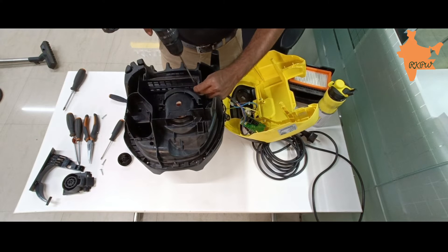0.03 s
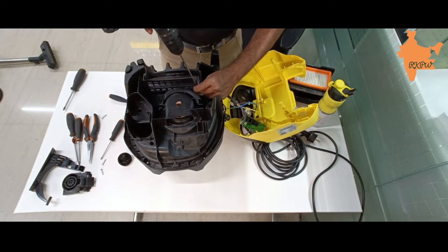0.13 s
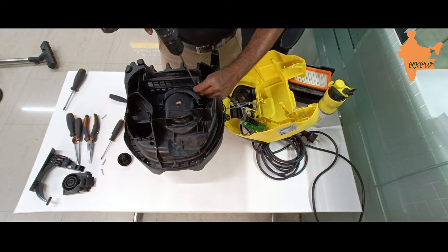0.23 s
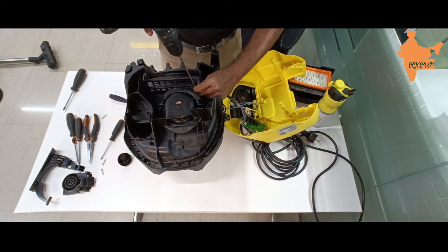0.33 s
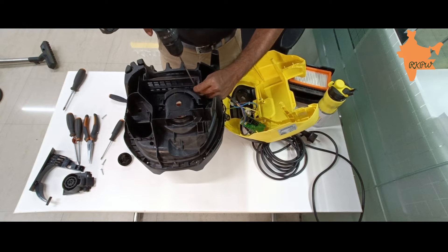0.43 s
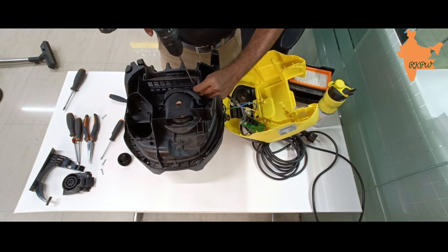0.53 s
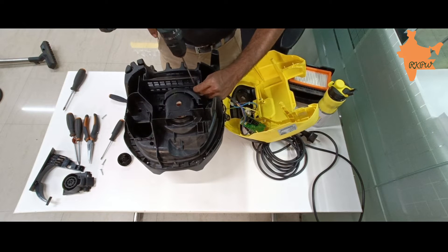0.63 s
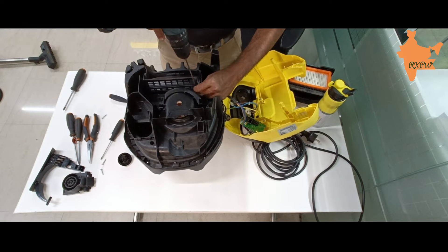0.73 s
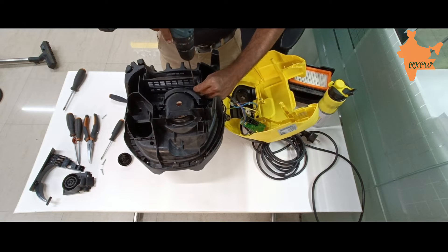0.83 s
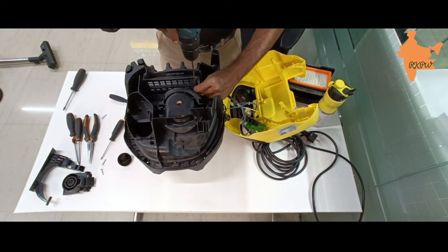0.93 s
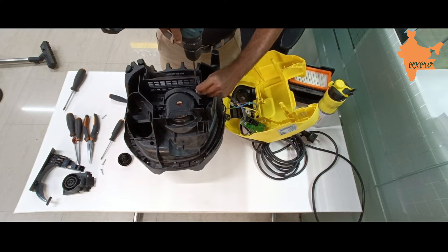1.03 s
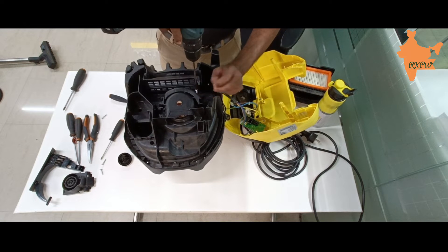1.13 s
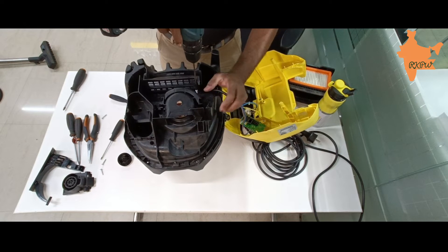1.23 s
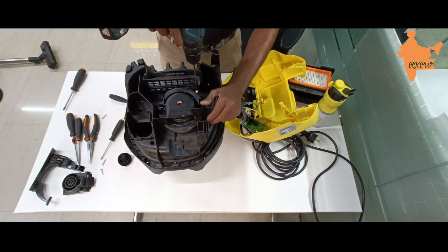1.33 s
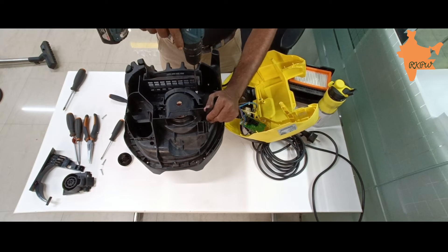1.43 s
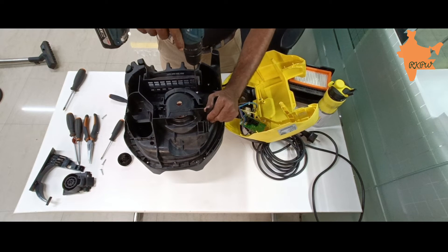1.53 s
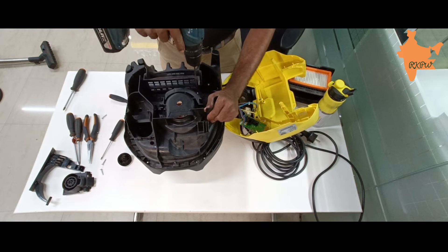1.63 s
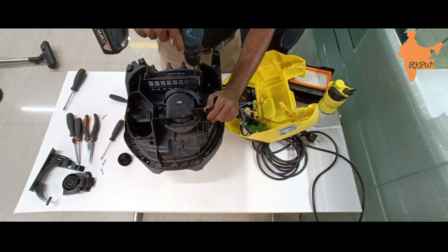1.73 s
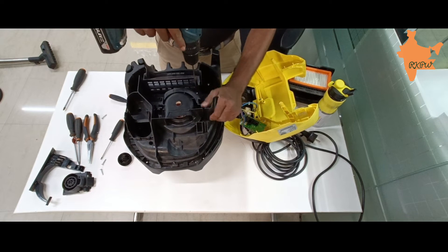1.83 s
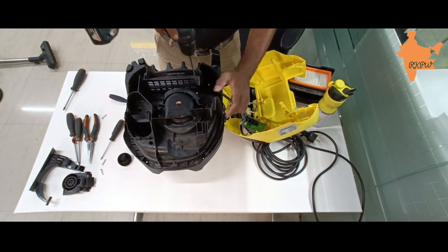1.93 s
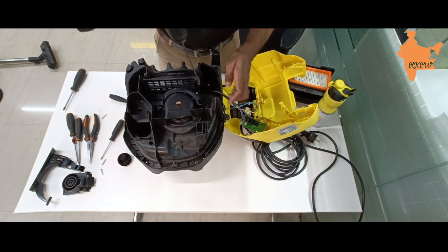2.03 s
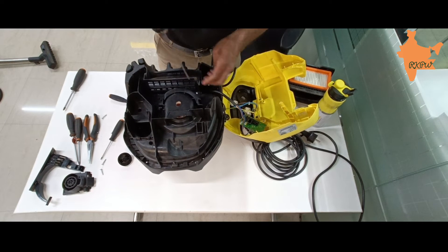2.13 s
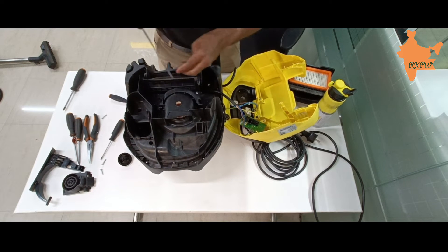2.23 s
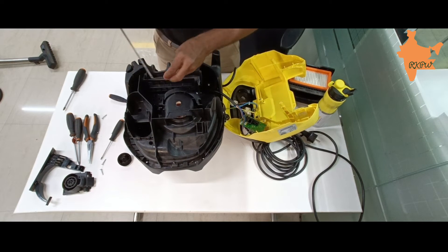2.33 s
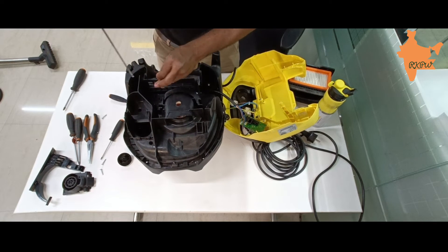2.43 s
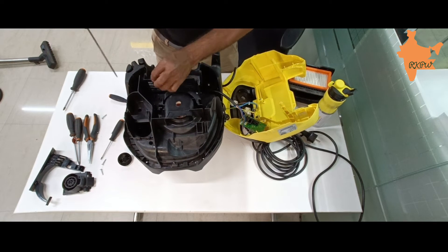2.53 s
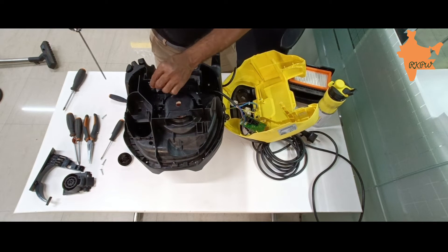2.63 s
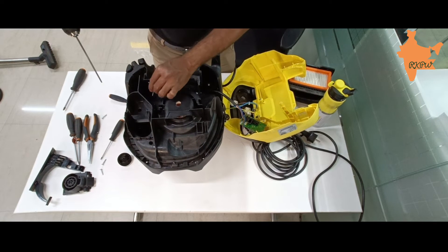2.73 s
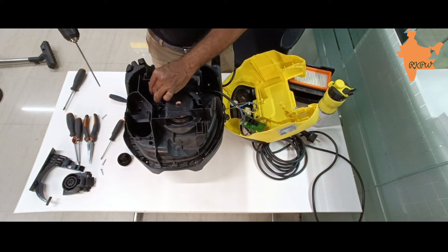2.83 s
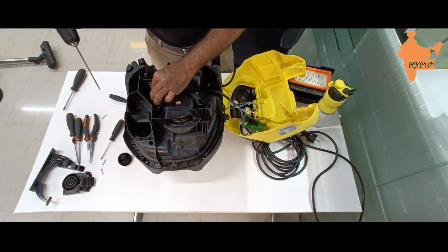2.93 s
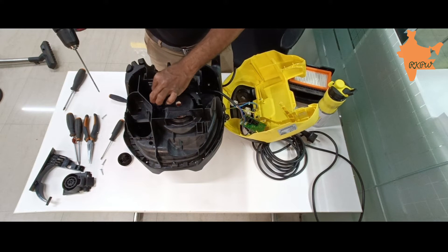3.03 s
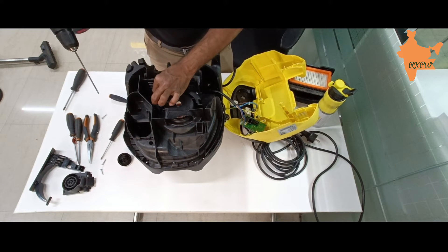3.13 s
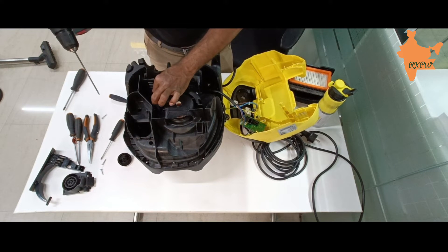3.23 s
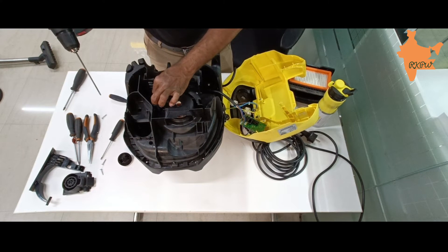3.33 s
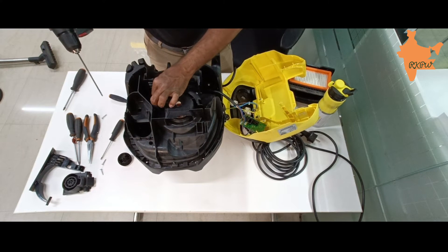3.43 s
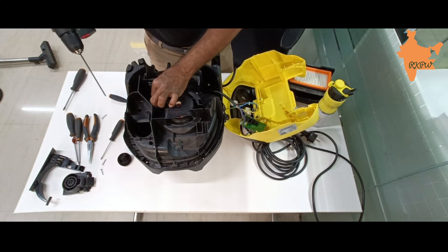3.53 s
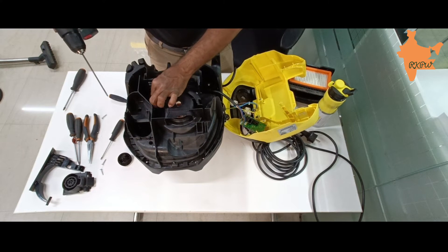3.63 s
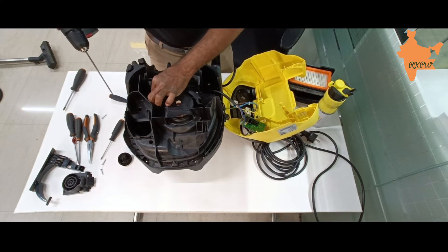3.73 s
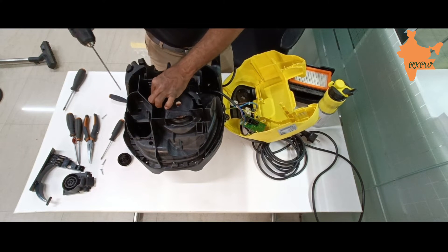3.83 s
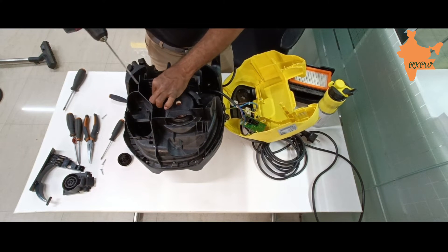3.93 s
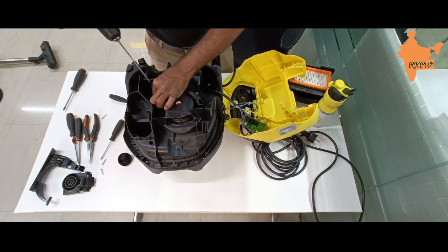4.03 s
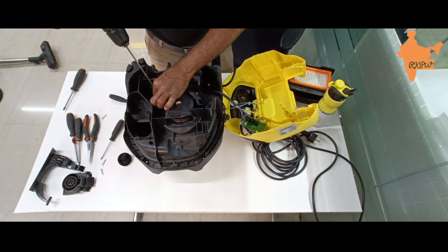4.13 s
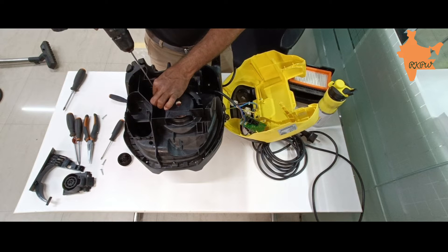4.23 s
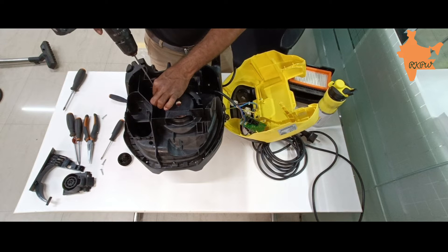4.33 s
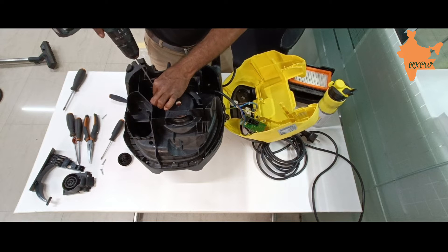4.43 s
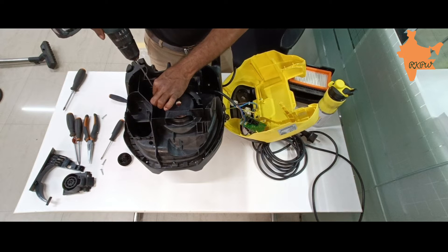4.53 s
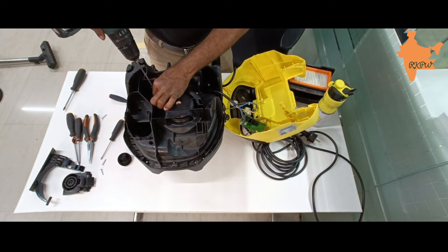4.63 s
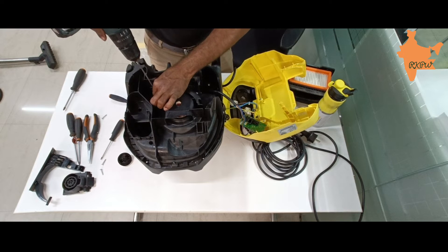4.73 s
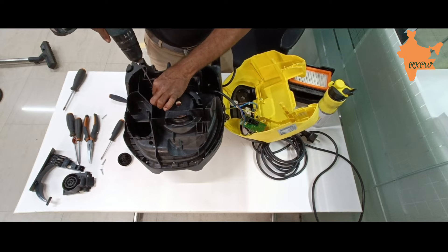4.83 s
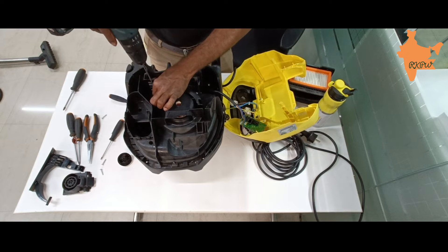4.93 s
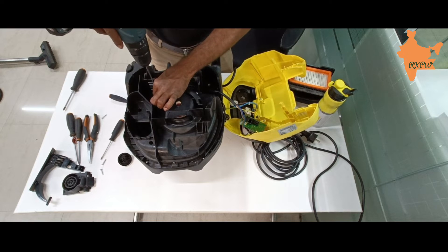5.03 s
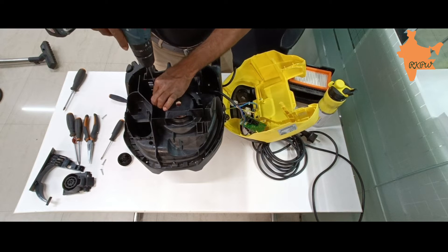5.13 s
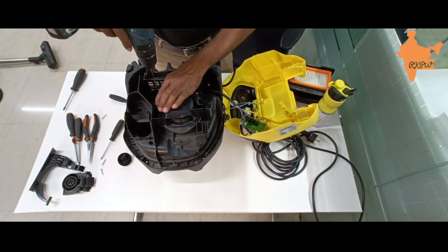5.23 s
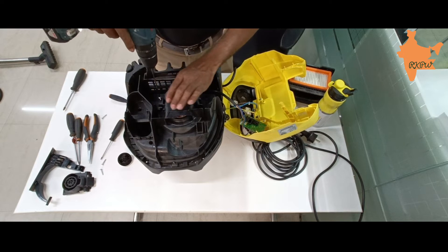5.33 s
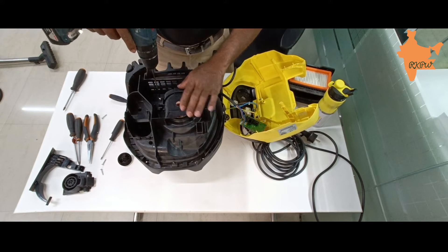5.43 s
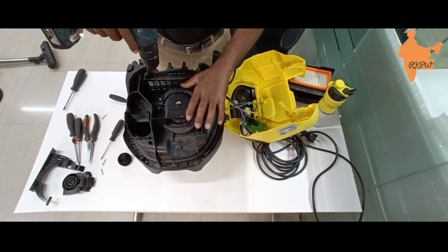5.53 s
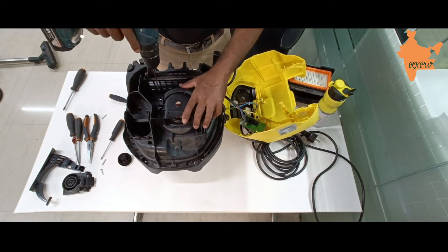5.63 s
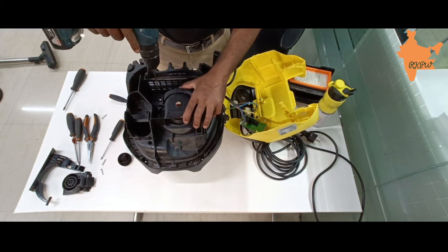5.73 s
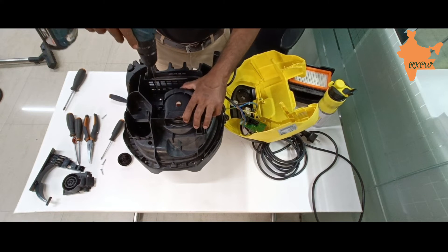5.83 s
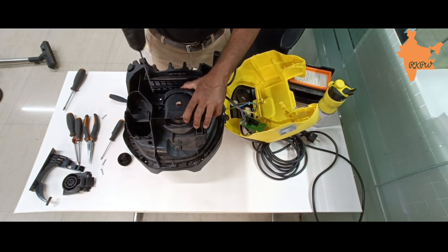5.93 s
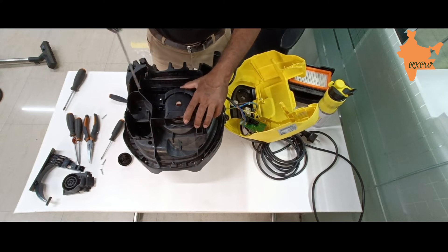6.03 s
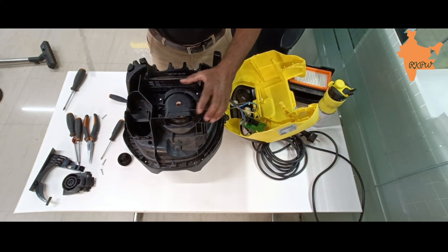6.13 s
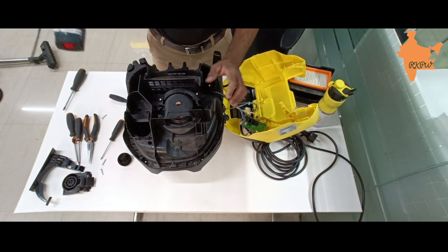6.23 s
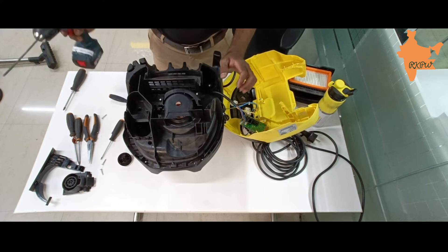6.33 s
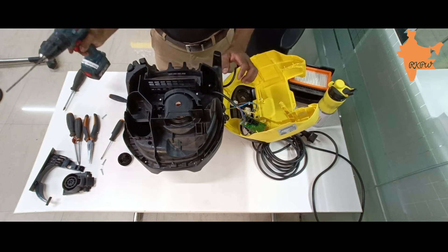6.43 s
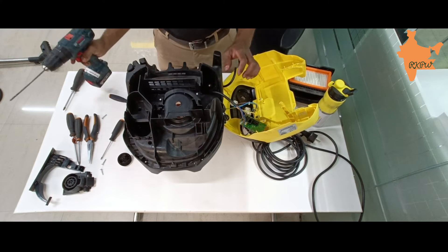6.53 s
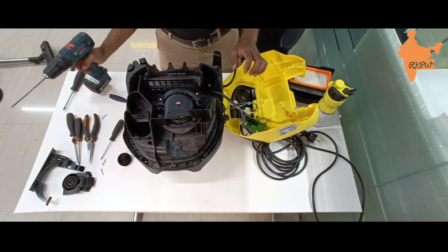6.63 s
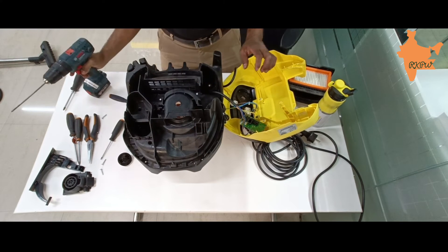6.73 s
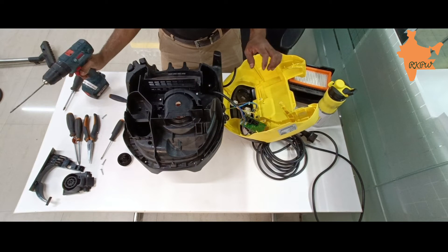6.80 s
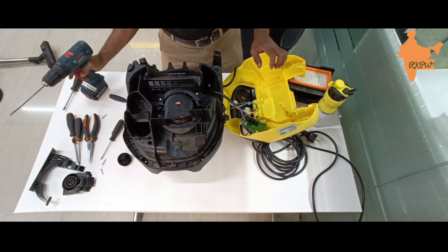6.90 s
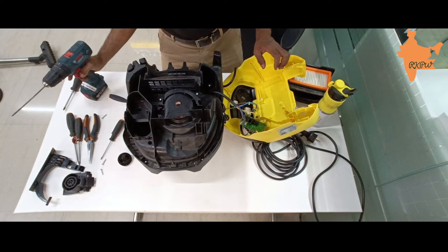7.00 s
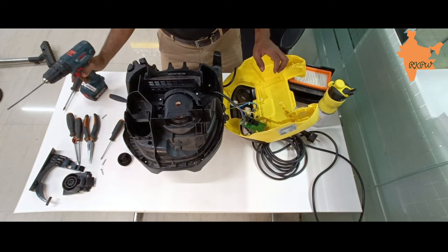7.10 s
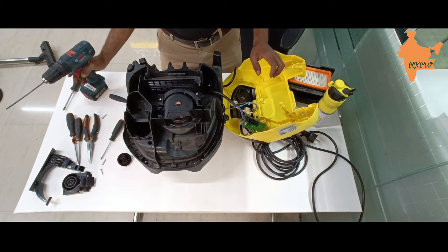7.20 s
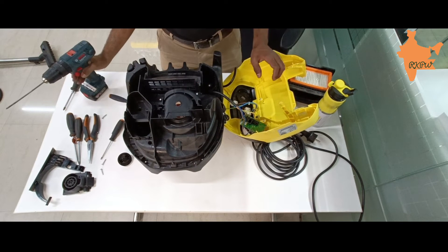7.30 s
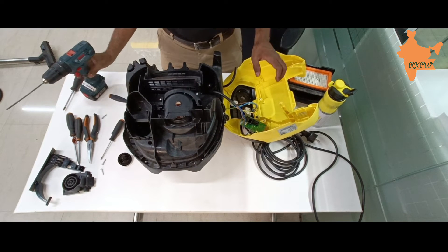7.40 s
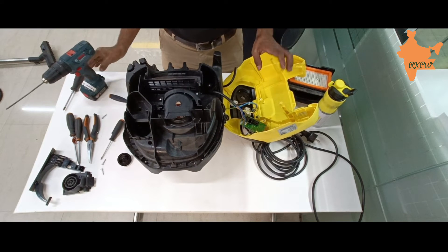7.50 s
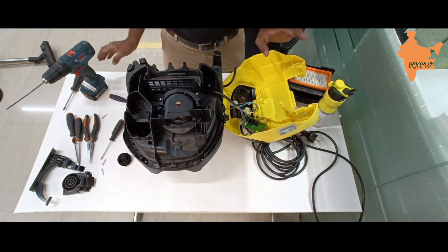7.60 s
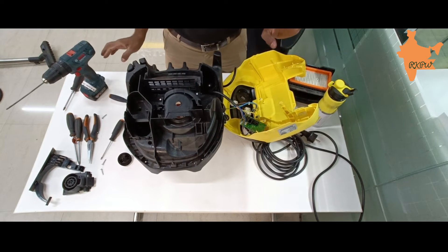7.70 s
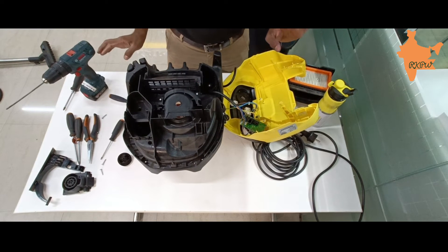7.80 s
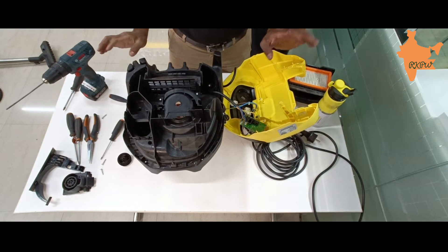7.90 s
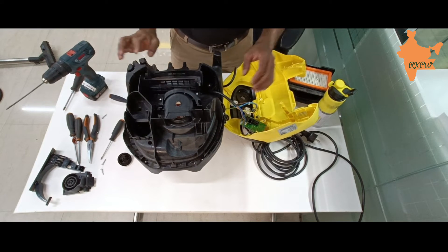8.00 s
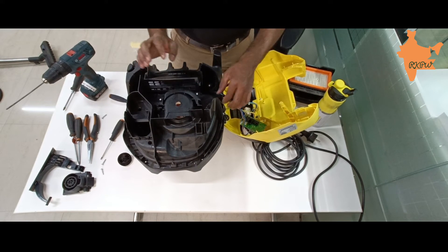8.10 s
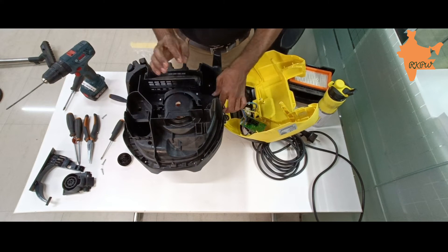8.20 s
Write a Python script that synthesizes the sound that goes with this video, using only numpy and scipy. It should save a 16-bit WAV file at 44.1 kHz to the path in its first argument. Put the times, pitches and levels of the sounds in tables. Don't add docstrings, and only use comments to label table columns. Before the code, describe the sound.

Quiet room air and distant engine hum, with tiny ticks. A power drill speeds up sharply, then brakes with a rattling clatter. A dropped screw tinkles in quick bounces, dying into a roll. After small clicks, the drill runs again at a steadier, lower pitch, thudding and clattering to a stop. The tool lands on the table in several wooden knocks, then plastic taps and a scrape. Everything rings in a reflective workshop, picked up in stereo.

```python
import sys
import numpy as np
from scipy import signal
from scipy.fft import rfft, irfft
from scipy.io import wavfile
from scipy.ndimage import uniform_filter1d

SR = 44100
rng = np.random.default_rng(int(sys.argv[2]) if len(sys.argv) > 2 else 0)


def store_wav(level_fs):
    pcm = np.round(np.clip(np.atleast_2d(level_fs), -1, 1) * 32767)
    wavfile.write(sys.argv[1], SR, pcm.T.astype(np.int16))


def level_to_linear(level):
    exponent = np.asarray(level, float) / 20
    return 10 ** exponent


N = 364266
T = np.arange(N) / SR
SIDES = np.array([[1], [-1]])

# [t/s, gear speed f/Hz, whine level/dB, second mesh level/dB]
RUN_1 = [
    (0.81, 522.6, -50.5, -51),
    (0.889, 713, -39.5, -46.5),
    (0.95, 778.4, -35.5, -46),
    (1.225, 796, -37, -47),
    (1.262, 954, -36, -47.5),
    (1.321, 1510, -34.5, -35.5),
    (1.36, 1710, -24, -32),
    (1.42, 1856, -22.5, -27),
    (1.451, 1904, -32, -42.5),
]
# [t/s, gear speed f/Hz, whine level/dB, second mesh level/dB]
RUN_2 = [
    (4.88, 764.5, -38, -58.5),
    (4.94, 1053, -34.5, -58.5),
    (4.99, 1206, -32.5, -43),
    (5.041, 1231, -34.5, -33.5),
    (5.129, 1221, -30, -35),
    (5.211, 1172, -29, -35.5),
    (5.268, 1221, -29.5, -34),
    (5.34, 1237, -29.5, -33),
    (5.429, 1368, -33, -30),
]
# [multiple of gear speed, level below second mesh/dB]
SIDE_LINES = [
    [(.49, -16.5), (.79, -10), (.985, -7)],
    [(.49, -9), (.79, -34), (.94, -11)],
]
# [multiple of gear speed, level re whine/dB]
VENT_LINES = [(5.45, -1.5), (5.999, -12), (8, -8.5)]
VENT_HZ, VENT_OCTAVES = 7100, 0.34
MESH_ORDER = 2.055
GEAR_JITTER = .0095
SURGE_JITTER, SURGE_FLICKER_DB = .002, .7
STEADY_DB, SWAY_DB = 1.8, .7
# [f/Hz, level/dB]
HISS_SPECTRUM = [(150, -51), (250, -9), (507, -19), (563, -7), (717, -15.5), (1140, -8), (1790, -12.5),
                 (2440, -6), (2900, -7.5), (5690, -6), (6760, -5), (15500, -19)]
# [f/Hz, width/Hz, level/dB]
AIR_SLOTS = [(6050, 350, -3), (6700, 400, 0), (7300, 350, -4)]
AIR_SLOTS_DB, HISS_FLICKER_DB = -9, 1.2
# [t/s, hiss level at IDLE_HZ/dB]
TRIGGER_PULLS = [
    (0.772, -32),
    (4.841, -30.5),
]
IDLE_HZ, HISS_DB_PER_OCTAVE, SPIN_UP_S, HISS_RUNS_ON_S = 806, 7.5, 0.03, 0.0095
PORT_LAG_SAMPLES = 8

# [t/s, hold/s, level/dB, body thump level/dB]
BRAKE_STOPS = [
    (1.423, 0.16, -14, -26),
    (5.414, 0.15, -13, -22),
]
# [f/Hz, level/dB]
CHATTER_SPECTRUM = [(410, -47.5), (700, -20), (766, -3.5), (955, -16.5), (1390, -3), (1560, -8.5),
                    (2000, -8), (2520, -10.5), (6670, -9.5), (9220, -17.5), (13800, -15.5), (15500, -25.5)]
# [f/Hz, width/Hz, level/dB]
GEAR_CASE = [(1382, 36, 0.5), (2225, 16, -6.5), (2930, 150, -8.5), (3568, 160, -6), (4310, 40, -9.5),
             (5600, 41, -7.5), (6050, 38, -1.5), (6470, 420, -3.5)]
# [f/Hz, width/Hz, level/dB]
HOUSING_MODES = [(331.5, 35, 1.5), (505, 35, -1.5), (579, 21, -4), (792, 31, -6.5), (1350, 53, 0),
                 (2010, 75, -6.5)]
GEAR_CASE_DB, RUMBLE_DB, BRAKE_EDGE_S = -12, -1, 0.011
BRAKE_SAG_DB, BRAKE_RELEASE_S, BRAKE_RELEASE_DB, THUMP_RELEASE_DB = -4.5, 0.053, -24, -12.5
TOOTH_HZ, TOOTH_DEPTH, TOOTH_SHARE = 69.1, 1.2, 0.099

# [t/s, peak level/dB, top level/dB, left minus right level/dB]
SCREW_BOUNCES = [(1.8698, -4, -23.5, 0.5), (1.9227, -8.5, -34, 0.5), (2.0489, -9, -44, -2),
                 (2.0963, -8, -43.5, -1), (2.1482, -10.5, -48.5, -2), (2.224, -14.5, -44, 0),
                 (2.2704, -5, -37.5, 0.5), (2.3502, -11.5, -17, 2), (2.3702, -8, -19, -6),
                 (2.436, -17.5, -21, 1), (2.4585, -9.5, -46, -8.5), (2.5318, -10, -23, -4),
                 (2.5877, -11, -20, -1), (2.6251, -18, -19, -6), (2.6605, -15.5, -25.5, -6),
                 (2.6984, -15, -29.5, -3), (2.7279, -28.5, -30.5, -12.5), (2.7708, -28, -37, -10),
                 (2.4, -41, -30, 1.5), (2.4926, -23, -32, 3.5), (2.547, -20.5, -32, 3),
                 (2.605, -16, -25, -5.5), (2.653, -16.5, -28, 5), (2.7485, -19, -22, -1),
                 (2.792, -20, -33, -10), (2.7386, -19.5, -30, -5), (2.809, -29, -30, -12),
                 (2.8338, -25, -35, -14), (2.851, -27, -32, -18), (2.877, -31, -30, -17)]
# [t/s, peak level/dB, low ring level/dB, top level/dB, left minus right level/dB]
METAL_TICKS = [(0.0942, -33, -10, -27, -7), (0.2294, -46.5, -22, -5, -4), (0.7577, -35.5, -14, -4, 4.5),
               (3.1694, -61, 11, -13.5, 7), (3.2869, -43, 18.5, -16.5, 0.5),
               (3.3134, -42.5, 10.5, -40, -14), (3.319, -43, 0, -40, 12), (3.4471, -32.5, 11, -47, 3),
               (3.4894, -48.5, 16, -47, 6), (3.5438, -29, 10.5, -35, -7), (3.552, -21, -5.5, -36, -16),
               (4.4094, -46.5, -5, -25, 0), (4.817, -22, -31.5, -11.5, 3), (7.9513, -24.5, -13, -41, -8.5),
               (8.1599, -28.5, 2.5, -12, -5)]
# [f/Hz, level/dB, t60/s]
SCREW_MODES = [(2900, -4, 0.015), (3550, -2, 0.03), (4300, -5, 0.03), (5100, -3, .025), (6200, 0, .025),
               (6900, 0, 0.03), (7700, -3, 0.025)]
TILE_RING_DB, METAL_TAIL_GAIN = -23.5, .13
ROLL_START_S, ROLL_END_S, ROLL_REST_S = 2.37, 2.816, 0.058
ROLL_DB, ROLL_SAG_DB = -32.5, -7

# [t/s, peak level/dB, ring f/Hz, mid level/dB, top level/dB]
PLASTIC_KNOCKS = [(0.1, -44.5, 402, -17, 1), (0.562, -40.5, 607, -3, -4), (1.148, -31.5, 307, 17, 14),
                  (3.543, -35, 304, 11.5, 7), (4.704, -38.5, 574, -15, -16.5), (4.837, -36.5, 570, 10, 8),
                  (5.429, -16.5, 448, 5, -16), (5.602, -26.5, 345, -18.5, -18), (7.782, -52, 342, -15, -14),
                  (8.006, -50, 354, 4, -2), (8.082, -23, 335, 5, -11.5), (8.12, -29.5, 400, -20, -32),
                  (8.2535, -26.5, 724, 3, -3.5)]
# [multiple of ring f, level/dB]
PLASTIC_OVERTONES = [(1, 13.5), (1.299, -10.5), (1.681, -16), (2.4, 0.5), (3.0, -10.5)]
KNOCK_CYCLES = 39
# [t/s, peak level/dB, deep share level/dB, mid level/dB, top level/dB]
LANDINGS = [
    (6.555, -26, -10, 5.5, -16),
    (6.576, -30, 1.5, -6.5, -24),
    (6.679, -17, -8, -3, -11.5),
    (6.717, -23, -18, -6, -12),
    (6.744, -35.5, 0, 4, -32.5),
    (6.867, -25, 2.5, -6, -21),
    (6.926, -36.5, -5, -23, -26),
]
# [f/Hz, level/dB, t60/s]
TABLE_MODES = [(123, -9, 0.37), (172, -7.5, 0.67), (298, 1.5, 0.24), (342, -7, 0.56), (403, 4, 0.35),
               (486.6, -5.5, 0.27), (629, -14, 0.4), (710, -18, 0.18)]
HELD_SHARE, TABLE_BUZZ_DB = 0.61, -8.5
# [f/Hz, level/dB, t60/s]
RIB_MODES = [(1106, 1, 0.04), (1506, -2, 0.069), (1767, 6.5, .05), (2130, -5, 0.1), (2290, -10.5, 0.029),
             (2852, -12, 0.039), (3980, -8, 0.091)]
# [t/s, peak level/dB]
SEATING = [
    (5.386, -1),
]
# [f/Hz, level/dB, t60/s]
SHELL_MODES = [(345, 3.5, 0.068), (571, 2.5, 0.078), (482, 2, 0.033), (1025, -36, 0.072),
               (1350, -35, 0.036)]
# [t/s, peak level/dB, f/Hz]
TABLE_JOLTS = [
    (1.434, -17, 64.4),
    (1.465, -15.5, 52.2),
    (5.397, -28.5, 55.7),
    (5.471, -28, 147.3),
    (5.525, -27.5, 124.7),
]
# [f/Hz, width/Hz, level/dB]
DRILL_SHELL = [(1235, 100, 8), (1950, 19, 4), (2255, 63.4, 2), (2840, 39, -8), (3550, 30, -9.5),
               (4060, 98, 0), (5120, 130, -8.5), (6060, 140, -11), (6680, 75, -29)]
LOOSE_DB, LOOSE_T60_S = -19, 0.26
# [t/s, peak level/dB, f/Hz, t60/s, push/s]
LONE_RINGS = [(0.563, -32, 305, 0.096, 0.0018), (0.583, -28, 276, 0.057, 0.0023),
              (0.604, -33, 263, .12, .004), (0.624, -37, 250, 0.095, .004), (3.546, -36, 560, .08, 0.0027),
              (3.548, -45, 3600, .4, .004), (3.56, -49, 3570, .3, .01), (3.56, -52, 2500, .3, .01),
              (3.56, -60, 6100, .3, .01), (3.548, -46, 3380, .3, .004), (3.548, -54, 5670, 0.25, .004),
              (4.718, -35, 254, 0.064, .003), (4.751, -33, 233.5, .07, .006),
              (4.838, -27, 2070, 0.027, .002), (4.838, -37.5, 1115, 0.08, .002),
              (6.558, -33, 410, .3, .004), (6.69, -36, 403, 0.93, 0.016), (8.085, -30, 471, 0.16, .002),
              (8.155, -39.5, 282, 0.36, .01), (8.165, -37, 634, 0.067, .004),
              (.101, -47, 1850, 0.037, .003), (.098, -43.5, 6500, .03, .002), (.231, -53, 7700, .04, .002),
               (.231, -49, 600, 0.11, .003), (0.559, -51, 2400, .03, 0.0018), (.56, -50, 5500, .03, .002),
               (0.559, -46, 7300, .04, .002), (1.6154, -21, 7100, .015, 0.00082),
               (6.869, -46, 2950, 0.11, .002), (6.929, -47, 1850, 0.084, .004),
               (3.165, -47, 1400, 0.022, 0.0014), (3.288, -41, 2070, 0.022, 0.002),
               (3.289, -51, 5650, .025, .002), (3.316, -40.5, 2000, 0.027, .004),
               (3.446, -35.5, 2100, 0.026, 0.0018), (3.446, -40, 4820, 0.023, .002),
               (3.49, -41, 1400, 0.027, .002), (3.51, -49, 1400, .03, .002), (5.6, -31.5, 459, 0.3, 0.0059),
               (3.545, -30, 5100, 0.026, 0.0009), (1.878, -34, 1084, 0.056, .003),
               (2.278, -33, 1063, 0.033, 0.0024), (1.87, -45.5, 300, .1, 0.0018),
               (1.923, -45, 495, 0.048, 0.0015), (2.049, -45, 426, 0.087, .002),
               (8.082, -22, 1000, 0.016, 0.00083)]
# [t/s, level/dB]
HAND_SLIDES = [
    [(3.75, -72.5), (4.15, -63), (4.5, -67)],
    [(7.6, -74), (7.9, -63.5), (8.08, -56), (8.2, -52), (8.27, -35)],
]

# [f/Hz, t60/s, level/dB]
ROOM_BANDS = [(130, 0.41, -10.5), (320, 0.62, -4.5), (597, 0.61, 2), (1180, 0.88, -1.5), (2047, 0.74, 2.5),
              (3960, 0.9, -1.5), (6130, 0.81, -4), (9780, 0.64, -1), (13800, 0.32, 4)]
WHINE_ROOM_DB, RINGS_ROOM_DB = -13, -12
# [f/Hz, level/dB]
AIR_SPECTRUM = [(25, -10), (100, -9.5), (159, -14.5), (192, -17.5), (218, -15), (467, -18), (508, -21),
                (697, -21), (936, -33.5), (1020, -30), (3390, -44), (6660, -43), (15500, -59.5)]
# [loudest from t/s, until t/s, f/Hz, width/Hz, level/dB]
FAR_ENGINES = [(0.28, 0.99, 82, 19, -59.5), (1.1, 1.39, 44, 4.5, -41), (2.32, 3.12, 92, 4, -43.5),
               (3.5, 5.6, 46, 12, -45.5), (3.1, 5.65, 97, 8.7, -52.5), (6.5, 7.07, 50, 3.9, -43.5),
               (6.8, 6.74, 92, 7.7, -48.5), (8, 9.4, 72, 23, -52.5), (0.88, 7.3, 76, 11, -54)]
SWELL_DB_PER_S, FADE_DB_PER_S = 21.5, 39
# [start t/s, end t/s, f/Hz, level/dB]
FAR_WHISTLES = [
    (-.02, 0.095, 4260, -58),
    (.38, .55, 2940, -74),
    (4.583, 4.8, 3600, -74),
    (6.086, 6.502, 3300, -70),
]
MAINS_HZ, MAINS_WIDTH_HZ, MAINS_DB, MAINS_GROWS_DB = 188.6, 2.15, -58.5, 8
AIR_DB, DUCK_DB, DUCK_DELAY_S, AIR_RECOVER_S, HUM_RECOVER_S = -54.5, -11, 0.03, 0.43, 0.67
# [f/Hz, level/dB]
PORT_CAVITY = [(4500, 0.5), (5700, -0.5), (6600, 2.5), (7600, 1.5), (9000, -3)]
# [f/Hz, left minus right level/dB]
PORT_DIFFERENCE = [(300, -1), (1200, 0.5), (3500, -1), (5300, -2.5), (6200, -9), (6900, 0.5), (7600, -0.5),
                   (9700, 8), (11300, 6), (13000, -3), (15500, -2.5)]


def motor():
    air = from_left(wide(N, apart_hz=2500) + 0.16 * clicks(900, spread_db=-1.0))
    hiss = unit(colour(air, HISS_SPECTRUM)) + level_to_linear(AIR_SLOTS_DB) * resonate(air, AIR_SLOTS)
    treble = np.std(band(hiss.mean(axis=0), 4800, 14000))
    hiss = hiss * level_to_linear(-3.0 + HISS_FLICKER_DB * walk(40)) / treble
    out, lines = np.zeros((2, 2, N))
    for run, (start, db), sides in zip((np.array(RUN_1), np.array(RUN_2)), TRIGGER_PULLS, SIDE_LINES):
        first_s, last_s = run[0, 0], run[-1, 0]
        octaves = np.log2(np.interp(T, run[:, 0], run[:, 1]) / IDLE_HZ)
        spin_up = 1 - np.exp(-np.clip(T - start + 0.0094, 0, None) / SPIN_UP_S)
        gate = curve([(start, db), (last_s + HISS_RUNS_ON_S, db)])
        out = out + gate * level_to_linear(HISS_DB_PER_OCTAVE * octaves) * spin_up * hiss
        add(lines, first_s, gears(run, sides, count=int((last_s - first_s) * SR)))
    return out, lines


def gears(run, sides, count):
    t = run[0, 0] + T[:count]
    hz, whine_db, mesh_db = (uniform_filter1d(np.interp(t, run[:, 0], run[:, k]), size=1800)
                             for k in (1, 2, 3))
    surge = np.abs(np.gradient(np.log2(hz))) * SR
    jitter = (GEAR_JITTER * (hz / 1000) ** 2 + SURGE_JITTER * surge) * walk(330, count)
    turn = 2 * np.pi * np.cumsum(hz * (1 + jitter)) / SR
    turn = turn + SIDES * (0.12 + 0.11 * walk(9.6, count))

    def line(order, flicker_db):
        flicker = (flicker_db + SURGE_FLICKER_DB * np.sqrt(surge)) * walk(60, count)
        sway = SWAY_DB * SIDES * walk(20, count)
        return np.sqrt(2) * level_to_linear(flicker + sway) * np.sin(order * turn)

    mesh = line(MESH_ORDER, STEADY_DB) + sum(level_to_linear(db) * line(k, 2.3) for k, db in sides)
    lines = level_to_linear(whine_db) * line(4, STEADY_DB) + level_to_linear(mesh_db) * mesh
    for k, db in VENT_LINES:
        vent = np.exp(-(np.log2(k * hz / VENT_HZ) / VENT_OCTAVES) ** 2)
        lines = lines + level_to_linear(whine_db + db) * vent * line(k, 3.0)
    return lines * signal.windows.tukey(count, .05)


def brake():
    chatter = from_left(wide(N, apart_hz=2590)) * ratchet()
    bright = unit(colour(chatter, CHATTER_SPECTRUM)) + level_to_linear(GEAR_CASE_DB) * resonate(chatter, GEAR_CASE)
    bright = level_to_linear(0.71 * walk(49)) * unit(bright)
    body = resonate(clicks(58, spread_db=4.5) + .5 * noise(), HOUSING_MODES)
    rumble = unit(band(wide(N, apart_hz=300), 100, 540))
    body = body + level_to_linear(RUMBLE_DB + 1.5 * walk(30)) * rumble
    out = np.zeros((2, N))
    for s, hold, db, thump_db in BRAKE_STOPS:
        out += bright * fading(s, hold, db, BRAKE_SAG_DB, BRAKE_RELEASE_S, BRAKE_RELEASE_DB, BRAKE_EDGE_S)
        out += body * fading(s, hold, thump_db, BRAKE_SAG_DB, BRAKE_RELEASE_S, THUMP_RELEASE_DB)
    return level_to_linear(-2.5) * out


def ratchet():
    teeth = np.cumsum(TOOTH_HZ * (1 + .25 * walk(60))) / SR
    size = level_to_linear(4.0 * noise(N // 100))[teeth.astype(int)]
    return 1 + TOOTH_DEPTH * size * np.exp(-(teeth % 1) / TOOTH_SHARE)


def metal(events, body_hz, ring_hz, ring_s, rattle, rattle_s):
    out = np.zeros((2, N))
    for s, peak_db, low_db, top_db, pan_db in events:
        x = 0.3 * ring(SCREW_MODES, spread_db=3.5, detune=0.07, push_s=.0001)
        x = x + 0.35 * crack(2400, 7870, 0.014) + METAL_TAIL_GAIN * crack(1800, 7700, 0.2)
        x = x + rattle * level_to_linear(low_db) * crack(950, body_hz, rattle_s)
        x = x + level_to_linear(top_db) * crack(5600, 13000, 0.034)
        surface = [(ring_hz, 0, ring_s), (1.9 * ring_hz, -5, 0.27 * ring_s)]
        x = x + level_to_linear(low_db - 9.0) * ring(surface, spread_db=0.0, detune=0.0073, push_s=0.00038)
        add(out, s, level_to_linear(peak_db + SIDES * (pan_db - 0.5) / 2) * x)
    return out


def roll():
    touches = uniform_filter1d(np.abs(clicks(180, spread_db=4.0)), size=90)
    gain = fading(ROLL_START_S, ROLL_END_S - ROLL_START_S, ROLL_DB, ROLL_SAG_DB, ROLL_REST_S, -34)
    rattle = band((0.15 + touches) * wide(N, apart_hz=1300), 1830, 8650, order=4)
    return gain * level_to_linear(-1.5) * unit(rattle)


def knocks():
    out = np.zeros((2, N))
    for s, peak_db, hz, mid_db, top_db in PLASTIC_KNOCKS:
        t60 = KNOCK_CYCLES / hz
        modes = [(k * hz, db, t60 / np.sqrt(k)) for k, db in PLASTIC_OVERTONES]
        x = ring(modes, spread_db=3.5, detune=0.036, push_s=0.00034)
        x = x + 1.2 * crack(230, 1200, 1.2 * t60)
        top = crack(2900, 7300, 0.12) + .5 * crack(6500, 12000, 0.018)
        add(out, s, level_to_linear(peak_db) * (x + level_to_linear(mid_db) * ribs(noise_share=0.43) + level_to_linear(top_db) * top))
    return out


def set_down():
    out = np.zeros((2, N))
    table = np.array(TABLE_MODES) * [1, 1, HELD_SHARE]
    for s, peak_db, deep_db, mid_db, top_db in LANDINGS:
        x = ring(table[3:], spread_db=3.5, detune=0.0036, push_s=0.0025)
        x = x + level_to_linear(deep_db) * ring(table[:3], spread_db=-4.5, detune=0.0046, push_s=0.013)
        x = x + level_to_linear(TABLE_BUZZ_DB) * crack(140, 740, 0.25)
        top = crack(3300, 7500, 0.12) + 0.21 * crack(9300, 15000, 0.084)
        add(out, s, level_to_linear(peak_db) * (x + level_to_linear(mid_db) * ribs(noise_share=0.67) + level_to_linear(top_db) * top))
    return out


def seat_and_jolts():
    out = np.zeros((2, N))
    for s, peak_db in SEATING:
        thud = level_to_linear(peak_db) * ring(SHELL_MODES, spread_db=-3.0, detune=0.000895, push_s=0.00072)
        add(out, s, thud + level_to_linear(peak_db - 10.5) * crack(500, 1400, 0.068))
    for s, peak_db, hz in TABLE_JOLTS:
        mid = ring([(hz, 0, .07), (2.6 * hz, -3, .05)], spread_db=12.5, detune=0.014, push_s=0.0025)
        side = ring([(1.3 * hz, 0, .07), (4.2 * hz, -2, .05)], spread_db=3.5, detune=0.071, push_s=0.00392)
        add(out, s, level_to_linear(peak_db) * (mid + .5 * SIDES * side))
    return out


def ribs(noise_share):
    tone = ring(RIB_MODES, spread_db=4.5, detune=0.035, push_s=0.00021)
    return noise_share * crack(900, 3300, 0.15) + 0.59 * tone


def loose():
    shake = sum((T > s) * level_to_linear(db + mid_db + LOOSE_DB - 60 * np.clip(T - s, 0, 2) / LOOSE_T60_S)
                for s, db, _, mid_db, _ in LANDINGS)
    ticks = clicks(350, spread_db=4.0) + 0.39 * wide(N, apart_hz=1490)
    return shake * resonate(ticks, DRILL_SHELL)


def rings():
    out = np.zeros(N)
    for s, peak_db, hz, t60, push_s in LONE_RINGS:
        modes = [(hz, 0, t60), (1.04 * hz, -10, t60)]
        add(out, s, level_to_linear(peak_db) * ring(modes, spread_db=5.5, detune=0.0029, push_s=push_s))
    return out


def scuff():
    drag = unit(band(wide(N, apart_hz=1196), 1000, 6900, order=4))
    return sum(map(curve, HAND_SLIDES)) * level_to_linear(1.3 * walk(100)) * drag


def room(x):
    t = T[:SR]
    tail = sum(band(wide(SR, apart_hz=150), hz / 1.375, hz * 1.162) * level_to_linear(db - 60 * t / t60)
               for hz, t60, db in ROOM_BANDS)
    tail = tail * np.clip((t - .003) / 0.0021, 0, 1)
    return signal.fftconvolve(x[:1], tail / np.sqrt(np.sum(tail ** 2) / 2), axes=1)[:, :N]


def background():
    air = colour(wide(N, apart_hz=751), AIR_SPECTRUM)
    air = level_to_linear(AIR_DB + 1.0 * walk(4.7)) * air / np.std(band(air[0], 200, 700))
    hums = level_to_linear(MAINS_DB + MAINS_GROWS_DB * T / T[-1]) * hum(MAINS_HZ, MAINS_WIDTH_HZ)
    for start, end, hz, width, db in FAR_ENGINES:
        swell_db = SWELL_DB_PER_S * np.clip(start - T, 0, None)
        fade_db = FADE_DB_PER_S * np.clip(T - end, 0, None)
        hums = hums + level_to_linear(db - swell_db - fade_db) * hum(hz, width)
    out = ducking(AIR_RECOVER_S) * air + ducking(HUM_RECOVER_S) * hums
    for start, end, hz, db in FAR_WHISTLES:
        tone = np.sin(2 * np.pi * np.cumsum(hz + 10 * walk(120)) / SR)
        out = out + curve([(start, db), (end, db)]) * level_to_linear(2.5 * walk(60)) * tone
    return out


def hum(hz, width):
    mid, side = band(noise(2, N), hz - width / 2, hz + width / 2)
    steady = np.sin(2 * np.pi * np.cumsum(hz + 0.27 * width * walk(3)) / SR + SIDES * 0.17)
    return 1.25 * steady + .3 * unit(mid) + .42 * SIDES * unit(side)


def ducking(recover_s):
    since = np.clip([T - s - hold - DUCK_DELAY_S for s, hold, _, _ in BRAKE_STOPS], -.1, None)
    dip = np.where(since < 0, 1 + since / 0.099, np.exp(-(since / recover_s) ** 2))
    return level_to_linear(DUCK_DB * dip.sum(axis=0))


def noise(*shape):
    return rng.standard_normal(shape or N)


def wide(count, apart_hz):
    mid, side = noise(2, count)
    treble = signal.lfilter(*signal.butter(2, apart_hz, "highpass", fs=SR), side)
    return mid + SIDES * (0.23 * side + 0.86 * treble)


def from_left(x):
    return np.vstack([x[0], np.roll(x[1], PORT_LAG_SAMPLES)])


def clicks(rate, spread_db):
    hit = rng.random(N) < rate / SR
    return unit(hit * noise() * level_to_linear(spread_db * rng.exponential(size=N)))


def crack(lo_hz, hi_hz, t60):
    t = T[:SR // 5]
    shape = (1 - np.exp(-t / 0.00066)) * level_to_linear(-60 * t / t60 + 1.8 * walk(220, len(t)))
    x = band(wide(len(t), apart_hz=1300) * shape, lo_hz, hi_hz, order=4)
    return np.pad(x / np.abs(x.mean(axis=0)).max(), ((0, 0), (0, SR // 2 - len(t))))


def ring(modes, spread_db, detune, push_s):
    hz, db, t60 = np.transpose(modes)[:, :, None]
    level_draw, pitch_draw = noise(2, len(modes), 1)
    t = T[:min(SR // 2, int(t60.max() * SR))]
    decay = level_to_linear(db + spread_db * level_draw - 60 * t / t60)
    x = np.sum(decay * np.sin(2 * np.pi * hz * (1 + detune * pitch_draw) * t), axis=0)
    x = x * (1 - np.exp(-t / push_s))
    return np.pad(x / np.abs(x).max(), (0, SR // 2 - len(t)))


def resonate(x, peaks):
    return unit(sum(level_to_linear(db) * band(x, hz - width / 2, hz + width / 2) for hz, width, db in peaks))


def band(x, lo_hz, hi_hz, order=2):
    return signal.sosfilt(signal.butter(order, [lo_hz, hi_hz], "bandpass", fs=SR, output="sos"), x)


def colour(x, points, scale=1):
    hz, db = np.transpose(points)
    grid_hz = np.linspace(1, SR / 2, 2049)
    log_gain = np.log(level_to_linear(scale * np.interp(np.log(grid_hz), np.log(hz), db)))
    cepstrum = irfft(log_gain)
    cepstrum[1:2048] *= 2
    cepstrum[2049:] = 0
    impulse = irfft(np.exp(rfft(cepstrum)))
    return signal.oaconvolve(np.atleast_2d(x), impulse[None], axes=1)[:, :N]


def walk(rate, count=N):
    k = int(SR / rate)
    held = np.repeat(noise(count // k + 1), k)
    return 1.294 * uniform_filter1d(uniform_filter1d(held, k), k)[:count]


def curve(rows, edge_s=.033):
    s, db = np.transpose(rows)
    inside = np.clip(np.minimum(T - s[0], s[-1] - T) / edge_s + .5, 0, 1)
    return inside * level_to_linear(np.interp(T, s, db))


def fading(start, hold, db, sag_db, release_s, release_db, edge_s=.033):
    end, end_db = start + hold, db + sag_db
    return curve([(start, db), (end, end_db), (end + release_s, end_db + release_db)], edge_s=edge_s)


def unit(x):
    return x / np.sqrt(np.mean(x ** 2))


def add(out, s, x):
    i = int(s * SR)
    out[..., i:i + x.shape[-1]] += x[..., :N - i]


def scene():
    hiss, whine = motor()
    stop = brake()
    bounces = np.insert(SCREW_BOUNCES, [2], TILE_RING_DB, axis=1)
    floor = metal(bounces, body_hz=2330, ring_hz=1090, ring_s=0.039, rattle=1.0, rattle_s=0.11) + roll()
    bench = from_left(knocks() + set_down() + seat_and_jolts() + loose()) + scuff()
    lone = rings()
    ticks = metal(METAL_TICKS, body_hz=4670, ring_hz=1400, ring_s=0.0197, rattle=0.39, rattle_s=0.0954)
    send = level_to_linear(-0.5) * hiss + level_to_linear(-4.5) * stop + level_to_linear(-2.5) * floor + level_to_linear(-7.0) * bench + level_to_linear(-6.0) * ticks
    send = send + level_to_linear(WHINE_ROOM_DB) * whine + level_to_linear(RINGS_ROOM_DB) * lone
    return hiss + whine + stop + floor + bench + lone + ticks + room(send) + background()


def band_limit(x):
    return signal.sosfilt(signal.butter(12, 15640, fs=SR, output="sos"), x)


def record(dry):
    left, right = colour(dry, PORT_CAVITY)
    ports = np.vstack([colour(left, PORT_DIFFERENCE, 0.51), colour(right, PORT_DIFFERENCE, -0.61)])
    mix = band(np.tanh(ports), 8, 15900, order=6)
    return band_limit(mix)


dry = scene()
out = record(dry)
store_wav(out)
```